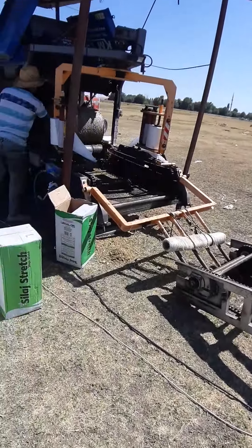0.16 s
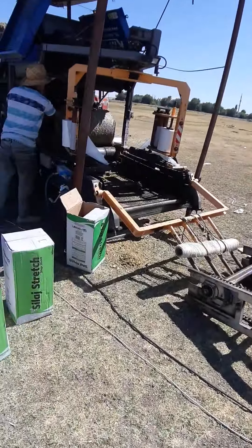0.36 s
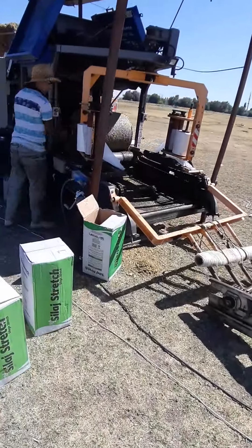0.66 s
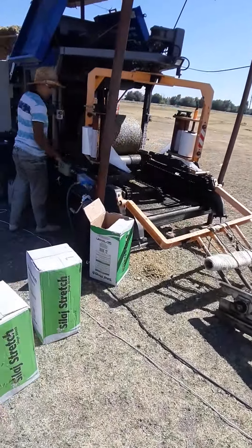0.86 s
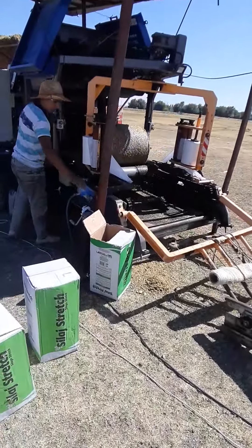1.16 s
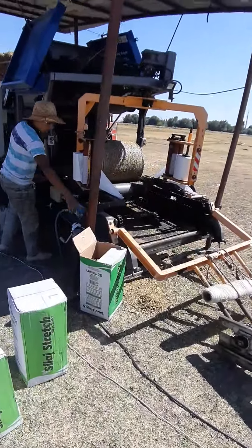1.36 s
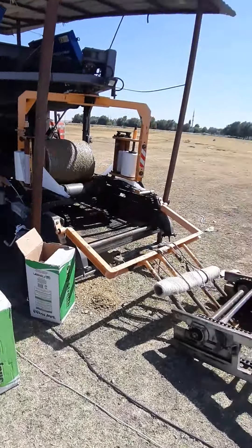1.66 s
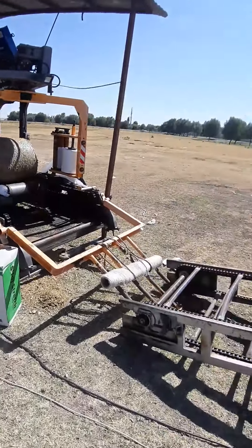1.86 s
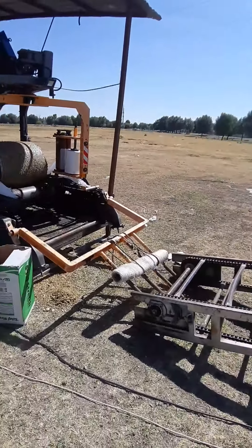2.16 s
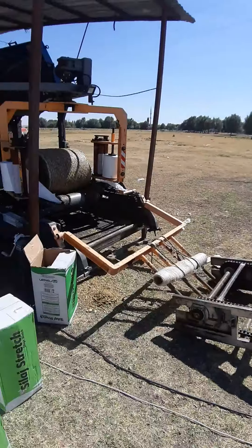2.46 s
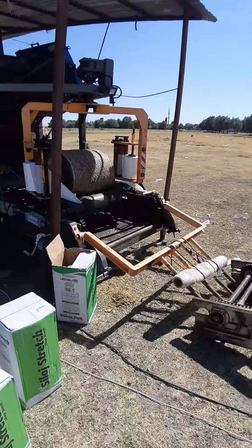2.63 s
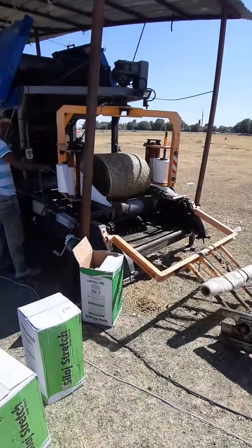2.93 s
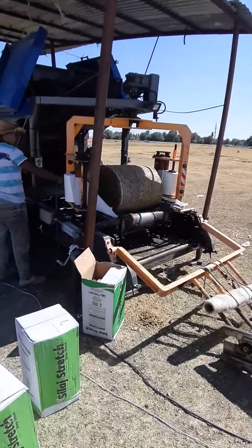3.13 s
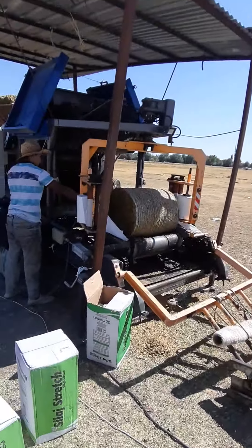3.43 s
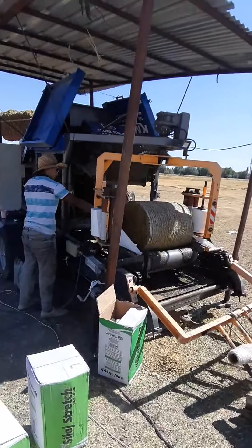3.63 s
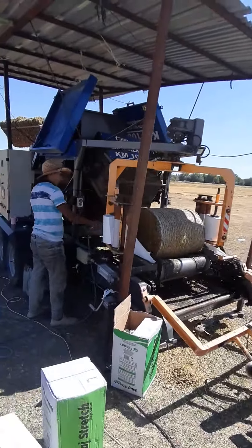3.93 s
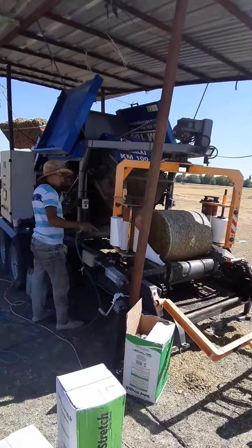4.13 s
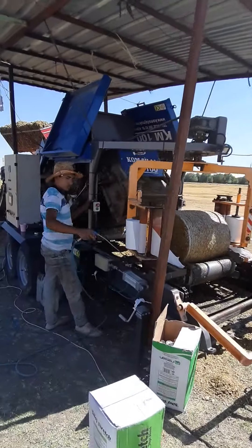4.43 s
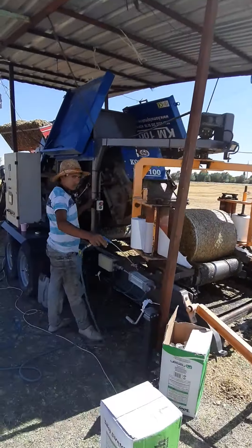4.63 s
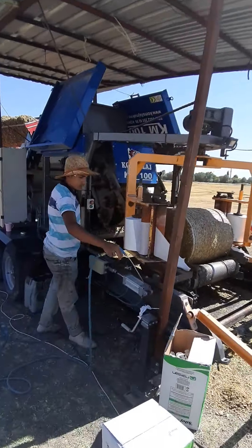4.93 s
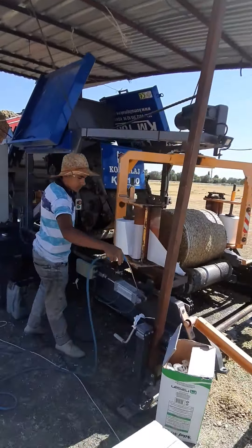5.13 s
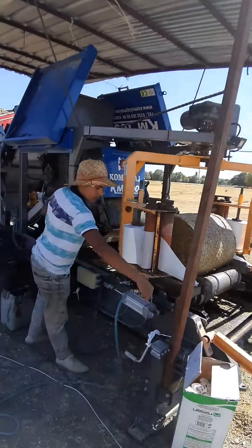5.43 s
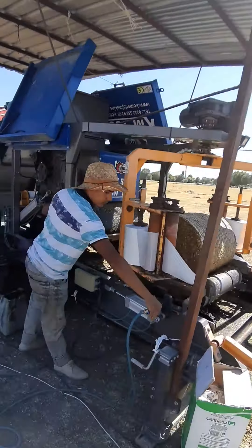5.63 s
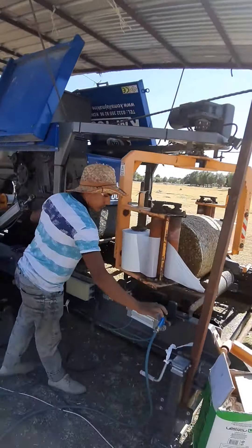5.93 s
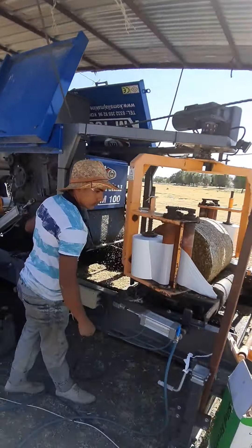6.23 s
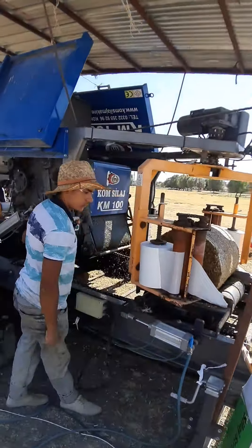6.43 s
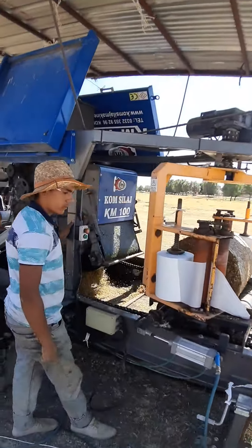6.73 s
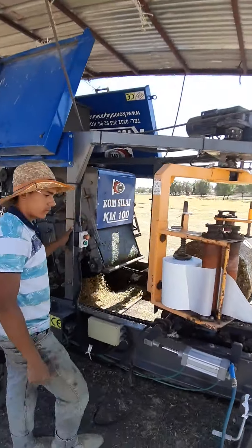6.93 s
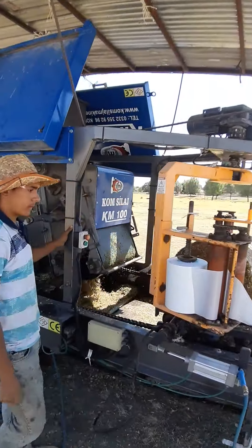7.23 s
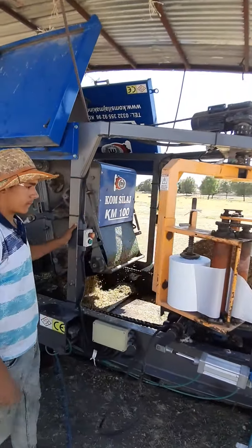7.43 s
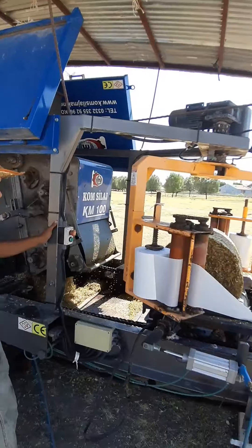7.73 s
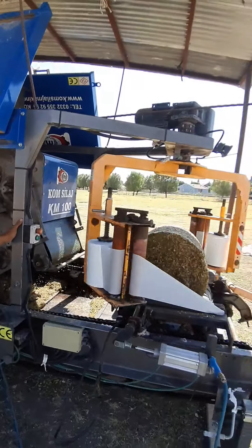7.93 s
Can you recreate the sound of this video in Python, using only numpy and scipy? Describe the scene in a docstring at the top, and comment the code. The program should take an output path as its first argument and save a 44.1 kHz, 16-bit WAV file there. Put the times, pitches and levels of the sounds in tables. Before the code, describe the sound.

Loud compressed air hisses for several seconds over the rapid chugging, chain rattle and squeaking of a running farm baler.

```python
"""Silage baler under a tin roof

A baler and wrapper runs at a field's edge, heard on a walk from its front round to its side.
Its piston compressor chugs 13.5 times a second over whining drives, rattling chains and a dry bearing.
An air line blows off in one short and one long blast; a light wind touches the microphone."""
import sys
import numpy as np
from scipy import signal
from scipy.fft import rfft, irfft, next_fast_len
from scipy.io import wavfile

SR = 44100
rng = np.random.default_rng(int(sys.argv[2]) if len(sys.argv) > 2 else 0)


def inscribe(sig):
    """Save sig as 16-bit PCM at rate SR to the path in sys.argv[1].

    A 1-D sig is mono; a 2-D sig holds one channel per row.
    Samples are clipped to [-1, 1] before scaling.
    """
    pcm = np.round(np.clip(np.atleast_2d(sig).T, -1, 1) * 32767)
    wavfile.write(sys.argv[1], SR, pcm.astype(np.int16))


N = 356328
TIME = np.arange(N) / SR
FFT_SIZE = next_fast_len(N)
FREQ = np.maximum(np.arange(FFT_SIZE // 2 + 1) * SR / FFT_SIZE, 1)

# the walk round the machine: time_s, aside (0 in front, 1 at the side)
WALK_ROUND = [(3, 0.005), (6, 0.72)]
# nearness of the machine, as loudness: time_s, gain_db
NEARNESS = [(2.3, 0), (6.2, -8.5), (7.0, -8), (7.75, 7), (8.05, 7.5)]

# pace of the crank: time_s, strokes_per_s
CRANK_SPEED = [(0, 13.51), (3.1, 13.51), (3.5, 13.535), (5.6, 13.53), (6.2, 13.49), (8.08, 13.48)]
# air pulses in the intake pipe, every stroke: offset_s, pitch_hz, length_s, front_db, side_db
INTAKE_PUFFS = [(-.0004, 470, 0.0025, 3.5, 6), (.0023, 503, .0127, -9, -10.5), (.0137, 364, .0063, -29, 6),
                (.0143, 426, 0.007, 3, -6.5), (.0509, 493, 0.011, -9, -19)]
# the reed's slap and flutter, every stroke: offset_s, pitch_hz, length_s, front_db, side_db
REED_FLUTTER = [(-.0001, 841, 0.00097, -1, 19.5), (.0145, 785, 0.0046, -4.5, 14),
                (.01826, 778, 0.005, -2, -17), (.0222, 840, 0.0073, 1, 8), (.0294, 960, .017, -11.5, 4),
                (.03293, 857, 0.023, -2.5, -12), (.05445, 890, .0177, -8.5, -10)]
# the chug along the walk: time_s, intake_db, reed_db
CHUG_LEVELS = [(0.1, -28, -28), (1.45, -26, -26.5), (1.9, -26.5, -31.5), (2.4, -25.5, -27.5),
               (2.7, -28.5, -36), (3.2, -30.5, -35.5), (3.55, -47, -46), (5.0, -51, -44),
               (6.2, -42.5, -49.5), (7.1, -41, -45), (7.6, -29.5, -34), (8.0, -29.5, -31)]
# the compressor's hum along the walk: time_s, level_db
HUM_LEVEL = [(.05, -35), (1.5, -33), (1.95, -37), (2.35, -35), (2.7, -41), (3.2, -40), (3.6, -59),
             (6.1, -62), (7.1, -69), (7.6, -41), (7.95, -34)]
# a sheet-metal panel ringing with the puffs: pitch_hz, t60_s, gain_db
PANEL_MODES = [(472, 0.079, -13), (531, 0.079, 10), (606, 0.15, 7), (679, 0.14, 10)]
# the frame shuddering with each stroke: pitch_hz, t60_s, gain_db
FRAME_MODES = [(684, 0.14, -1), (1015, 0.084, 5), (1167, 0.12, 5), (1219, 0.15, 4), (1298, 0.06, 3)]
# how much later the compressor arrives on the left: time_s, lag_s
COMPRESSOR_LAG = [(.8, -.00002), (2, .00005), (2.9, 0), (6.6, .00012), (7.7, .00018)]

# blasts of the air line: open_s, ease_s, close_s, easing_time_s, decay_s, rush_db, hiss_db
AIR_BLASTS = [(2.439, 2.837, 3.27, 0.13, 0.024, -21, -20), (3.259, 5.903, 6.147, 0.35, 0.023, -22.5, -20.5)]
# colour of the short blast: frequency_hz, density_db
SHORT_JET_COLOUR = [(350, -31), (600, 5), (727, -6), (856, -2), (1330, -14), (1500, -6), (2080, -10),
                    (2460, -2), (4420, -8), (6760, -3), (7860, -7), (12900, -3), (15800, -5)]
# colour of the long blast: frequency_hz, density_db
LONG_JET_COLOUR = [(1180, -37), (2000, -8), (2300, -7), (4830, -1.5), (5550, -3), (6210, -6), (7130, -2),
                   (8120, -8), (9010, -4.5), (12200, 2), (15100, 5.5), (15800, 1.5)]
# the jet sweeping over parts of the frame: start_s, length_s, roar_db, buffet_db
JET_STRIKES = [(2.412, 0.16, -22.5, -28), (2.605, .12, -34, -51), (2.776, 0.082, -34, -34),
               (2.9, 0.076, -32, -36), (3.269, 0.11, -28, -29.5), (3.306, 0.74, -30.5, -35.5),
               (3.586, 0.19, -26, -31), (3.774, 0.23, -27, -30.5), (3.987, 0.28, -29, -34),
               (4.163, 0.24, -26, -31.5), (4.36, 0.18, -24.5, -29), (4.496, 0.2, -22.5, -40),
               (4.644, 0.31, -29.5, -47.5), (4.834, 0.69, -30.5, -46), (5.566, 0.18, -30.5, -42)]
# colour of the jet's roar: frequency_hz, density_db
ROAR_COLOUR = [(650, -0.07), (1400, -2.0), (2900, -0.63)]
# colour of its low buffeting: frequency_hz, density_db
BUFFET_COLOUR = [(150, -21), (260, -6.5), (380, -1), (520, -0.5), (750, 0)]
# overtones of an open tube in the frame: pitch_hz, width_hz, gain_db
TUBE_MODES = [(1524, 17, -1.5), (1950, 40, -10), (2490, 60, -0.5), (2930, 35, -3), (3220, 42, -7),
              (3520, 39, -4), (4080, 71, -5)]
# the jet crossing the tube's mouth: start_s, length_s, level_db
TUBE_BLOWS = [(2.48, 0.089, -33), (2.595, 0.038, -25), (2.635, 0.11, -27), (2.772, 0.069, -23),
              (2.905, 0.045, -28)]
# whistles and squeals: start_s, length_s, start_hz, end_hz, width_hz, level_db
WHISTLE_GLIDES = [(0.113, 0.056, 5100, 4870, 50, -22), (1.205, 1.53, 2440, 2650, 158, -41.5),
                  (1.848, 0.96, 5480, 5710, 125, -41.5), (1.952, 0.072, 3300, 5100, 130, -37),
                  (2.163, 0.088, 5460, 4300, 130.4, -41), (2.242, 0.064, 5340, 4180, 130, -38),
                  (2.503, 0.47, 6800, 6580, 200, -31), (3.22, 0.66, 5620, 5550, 130, -30),
                  (4.65, 1.0, 4810, 4780, 110, -34), (5.03, .17, 4980, 4660, 120, -32),
                  (5.106, 1.06, 7010, 7130, 260, -31), (6.012, 0.13, 5820, 5160, 327, -25),
                  (6.104, 0.063, 4900, 4700, 303, -23)]
# short scrapes and spits: start_s, length_s, low_hz, high_hz, level_db
SPIT_BURSTS = [(1.611, 0.02, 5760, 7200, -33), (2.452, 0.082, 1460, 5280, -19.5),
               (2.598, 0.028, 1400, 4550, -18.5), (2.636, 0.055, 3000, 8100, -20),
               (2.77, 0.12, 2440, 7450, -23), (3.27, 0.26, 7200, 10860, -31), (5.5, 0.63, 7000, 9560, -39),
               (6.03, 0.14, 4440, 7000, -26), (6.115, 0.058, 7400, 10100, -29),
               (6.12, 0.55, 6900, 11200, -44.5), (6.63, 0.042, 2500, 7300, -37),
               (7.152, 0.025, 3620, 6900, -31.5), (7.153, 0.033, 920, 5180, -30.5),
               (7.81, 0.24, 10900, 13200, -34), (7.93, 0.05, 2640, 4560, -22)]
# the jet catching an edge: start_s, level_db
EDGE_SPLUTTERS = [(3.282, -26), (3.311, -22), (3.394, -25), (3.545, -28), (3.64, -29), (3.70, -26),
                  (3.722, -29), (3.83, -25), (3.932, -25.5), (4.18, -26), (4.235, -24), (4.44, -29),
                  (4.47, -27), (4.625, -26), (4.68, -30), (4.739, -25.5), (4.799, -23), (4.845, -26.5),
                  (5.05, -25)]

# colour of the chains' and rollers' clatter: frequency_hz, density_db
CLATTER_COLOUR = [(520, 4), (1070, 1.5), (1500, -0.5), (2070, -2), (2960, -3), (3400, -3.5), (4200, -5.5)]
# colour of the frame's drone: frequency_hz, density_db
DRONE_COLOUR = [(110, -2.5), (190, -0.5), (250, -4.5), (380, -3.5), (520, -1)]
# colour of the chains' hiss: frequency_hz, density_db
CHAIN_COLOUR = [(4200, -2.5), (5500, 2.5), (6400, 0.5), (7000, 5.5), (7700, -0.5)]
# colour of the sizzle on top: frequency_hz, density_db
SIZZLE_COLOUR = [(7500, 2), (9000, -3), (11000, 1), (13000, 2), (15800, 0.5)]
# fader for chain hiss and sizzle: time_s, level_db
TREBLE_LEVEL = [(0.1, -33), (0.55, -42), (2.35, -42), (6.3, -34), (6.8, -50.5), (7.1, -49), (7.9, -31),
                (8.05, -30.5)]
# resonances of the drive: pitch_hz, width_hz, gain_db
WHINE_MODES = [(2216, 19, 1), (2340, 103, 1.5), (2480, 70, -4)]
# the whine along the walk: time_s, level_db
WHINE_LEVEL = [(2.3, -40.5), (5.9, -47), (6.9, -43), (7.75, -29.5), (8.05, -29.5)]
# how much later the whine arrives on the left: time_s, lag_s
WHINE_LAG = [(1, -.0001), (2.9, -.00003), (6.7, -.00001), (7.7, .00006)]
# the bearing's two faint tones, every stroke: offset_s, pitch_hz, length_s, front_db, side_db
BEARING_CHIRPS = [(0.018, 3752, 0.04, -48.5, -41.5), (0.035, 5270, 0.085, -47, -58)]
# the bearing's loud squeaks: start_s, pitch_hz, level_db
BEARING_SQUEAKS = [(0, 3740, -41), (.055, 3756, -41.5), (.435, 3756, -41), (1.02, 3760, -37),
                   (1.315, 3756, -31.5), (1.385, 3756, -36), (1.462, 3756, -35), (1.49, 5230, -33),
                   (1.537, 3736, -29), (1.611, 3730, -29.5), (1.688, 3756, -29.5), (1.705, 5250, -36),
                   (1.758, 3756, -30), (1.782, 5250, -37), (1.832, 3756, -36), (1.902, 3756, -38),
                   (2.051, 3770, -39), (2.08, 5200, -37), (2.205, 3756, -30), (2.228, 5300, -36),
                   (6.415, 3756, -40), (7.16, 3756, -47), (7.373, 3820, -40), (7.452, 3790, -35),
                   (7.526, 3756, -39), (7.6, 3720, -32), (7.672, 3756, -32)]

# colour of the wind rumble: frequency_hz, density_db
WIND_COLOUR = [(20, -35), (45, -32), (80, -4.5), (110, -3), (200, -4), (330, -5)]
# gusts on the microphone: start_s, length_s, level_db
WIND_GUSTS = [(-.03, 0.092, -23.5), (.1, 0.11, -27.5), (.72, 0.11, -37), (1.0, 0.1, -28),
              (1.58, 0.091, -33), (1.68, 0.12, -34), (2.34, 0.24, -35.5), (2.5, 0.057, -35),
              (2.92, .07, -37), (4.3, 2.04, -46), (5.62, 0.26, -43), (7.4, 0.41, -50)]
# reflections off ground, roof and frame: left_delay_s, right_delay_s, gain_db
SHED_ECHOES = [(.0044, .0052, -15), (.0115, .0096, -16), (.0262, .0245, -36), (.0371, .0368, -15.5)]
# how alike the noise is left and right: frequency_hz, correlation
STEREO_LIKENESS = [(60, 0.045), (300, 0.22), (700, 0.28), (1400, 0.17), (6800, -0.12), (15000, 0.19)]


def compressor():
    """The valve pops into the intake pipe and its reed flutters over a hum; panel and frame ring along."""
    intake_gain, reed_gain = gains(CHUG_LEVELS)
    aside = curve(WALK_ROUND)
    # suction starts each puff; the small pipe mouth radiates little bass
    puffs = butterworth(-each_stroke(INTAKE_PUFFS, aside), 1, 290, "high")
    passing_s, span_s = 2.1, 0.39  # the panel is loudest as it is passed
    panel_gain = from_db(-21.5) + from_db(-5) * np.exp(-((TIME - passing_s) / span_s) ** 2)
    intake = intake_gain * (puffs + panel_gain * ringing_metal(puffs, PANEL_MODES))
    reed = reed_gain * each_stroke(REED_FLUTTER, aside)
    chugs = butterworth(intake + reed, 2, 55, "high")
    frame_gain = from_db(-47 + 2 * aside + curve(NEARNESS))
    frame = frame_gain * ringing_metal(strokes(offset_s=0.015), FRAME_MODES)
    hum_phase = 2 * np.pi * 65 * crank_turns() + 0.15 * drift(5)  # 65th harmonic of the crank
    hum = from_db(curve(HUM_LEVEL)) * np.sqrt(2) * np.sin(hum_phase)
    return left_later(shed(chugs) + frame + hum, curve(COMPRESSOR_LAG)) * from_db([[-1.7], [1.1]])


def crank_turns():
    """Turns of the crank since the start."""
    return np.cumsum(curve(CRANK_SPEED)) / SR


def strokes(offset_s, spread_db=0.9, jitter_s=0.00005, first_s=0.0402):
    """One click in each turn of the crank, no two quite alike."""
    turns = crank_turns()
    turn_s = np.interp(np.arange(int(turns[-1]) + 1), turns, TIME)
    click_s = np.append(-1 / CRANK_SPEED[0][1], turn_s) + first_s + offset_s  # already running
    at = np.round((click_s + jitter_s * rng.standard_normal(len(click_s))) * SR).astype(int)
    at = at[(at >= 0) & (at < N)]
    clicks = np.zeros(N)
    clicks[at] = from_db(spread_db * rng.standard_normal(len(at)))
    return clicks


def each_stroke(tones, aside):
    """The valve's short tones, repeated every turn and coloured by where the listener stands; rms 1."""
    out = 0
    for offset_s, hz, length_s, front_db, side_db in tones:
        gain = from_db(front_db + aside * (side_db - front_db))
        out += gain * tone_bursts(strokes(offset_s), hz, length_s)
    return rms_one(out)


def air_blasts(opening_s=0.017, eased_db=-8, sag_db_per_s=1.14):
    """The nozzle hisses as hose pressure sags; where the jet strikes the frame it roars and buffets."""
    out, flow = 0, 0
    facing_db = 3 * swell(2.85, 3.9)  # the nozzle swings towards the listener
    for blast, colour in zip(AIR_BLASTS, (SHORT_JET_COLOUR, LONG_JET_COLOUR)):
        open_s, ease_s, close_s, easing_time_s, decay_s, rush_db, hiss_db = blast
        opening = np.clip((TIME - open_s) / opening_s, 0, 1)
        eased = 1 - np.exp(-np.maximum(TIME - ease_s, 0) / easing_time_s)
        pressure = opening * from_db(eased_db * eased - sag_db_per_s * (TIME - open_s))
        closed_for_s = np.maximum(TIME - close_s, 0)
        jet = pressure * np.exp(-closed_for_s / decay_s)
        emptying = pressure * np.exp(-closed_for_s / (3 * decay_s))  # hiss lingers as the hose empties
        rush = from_db(rush_db) * noise(colour, 3300, 7980, flicker_db=1.43, flicker_hz=19)
        hiss = from_db(hiss_db + facing_db) * noise(colour, 9560, 18900, flicker_db=1.1, flicker_hz=15)
        out += jet * rush + emptying * hiss
        flow += jet
    roars = [(s, length_s, db) for s, length_s, db, _ in JET_STRIKES]
    buffets = [(s, length_s, db) for s, length_s, _, db in JET_STRIKES]
    roar = noise(ROAR_COLOUR, 650, 3440, flicker_db=1.1, flicker_hz=70)
    roar *= surges(roars, fade_s=0.037, floor=from_db(-37))  # the free jet still roars a little
    buffet = noise(BUFFET_COLOUR, 185, 685, flicker_db=1.95, flicker_hz=34)
    buffet *= surges(buffets, fade_s=0.012)
    return out + flow * (roar + buffet)


def blown_tube():
    """The short blast sounds the overtones of an open tube: a hollow squeal."""
    return surges(TUBE_BLOWS, fade_s=0.0063) * resonant_noise(TUBE_MODES)


def whistles():
    """Breathy, sliding tones; the wider ones are more hiss than note."""
    white, out = rng.standard_normal((2, 2, N)), np.zeros((2, N))
    for start_s, length_s, start_hz, end_hz, width_hz, db in WHISTLE_GLIDES:
        at = during(start_s, length_s)
        breath = rms_one(butterworth(white[..., at], 2, width_hz, "low"))
        pitch_hz = np.interp(TIME[at], [start_s, start_s + length_s], [start_hz, end_hz])
        phase = 2 * np.pi * np.cumsum(pitch_hz) / SR
        tone = breath[0] * np.cos(phase) + breath[1] * np.sin(phase)
        out[:, at] += from_db(db) * swell(start_s, length_s)[at] * tone
    return out


def spits(splutter_s=0.027, splutter_band_hz=(637, 2830)):
    """Brief bursts of noise: bright spits, and duller splutters where the jet catches an edge."""
    splutters = [(s, splutter_s, *splutter_band_hz, db) for s, db in EDGE_SPLUTTERS]
    white = rng.standard_normal((2, N)) + 0.33 * rng.standard_normal(N)  # wide, with a little centre
    out = np.zeros((2, N))
    for start_s, length_s, low_hz, high_hz, db in SPIT_BURSTS + splutters:
        at = during(start_s, length_s)
        burst = rms_one(butterworth(white[:, at], 2, [low_hz, high_hz], "band"))
        out[:, at] += from_db(db) * swell(start_s, length_s)[at] * burst
    return out


def running_gear():
    """The machine's bed: chains and rollers clatter and hiss while the frame drones."""
    near_db, treble_db = curve(NEARNESS), curve(TREBLE_LEVEL)
    clatter = from_db(-32.5) * noise(CLATTER_COLOUR, 648, 4570, flicker_db=1.3, flicker_hz=19)
    rattle = from_db(-42) * chain_rattle(knocks_per_s=350, spread_db=3)
    drone = from_db(-45 + 0.81 * near_db) * noise(DRONE_COLOUR, 107, 506, flicker_db=1.5, flicker_hz=23)
    hiss = from_db(treble_db + 2.5) * noise(CHAIN_COLOUR, 3330, 7080, flicker_db=1, flicker_hz=26)
    sizzle = from_db(treble_db) * noise(SIZZLE_COLOUR, 5600, 22000, flicker_db=1, flicker_hz=27)
    return from_db(near_db) * (clatter + rattle) + drone + hiss + sizzle


def chain_rattle(knocks_per_s, spread_db, parts=16):
    """Links knock at random on small steel parts, each with its own pitch."""
    out = np.zeros((2, N))
    count = int(knocks_per_s * N / SR / parts) + 1
    for hz in np.geomspace(1100, 7000, parts):
        clicks = np.zeros((2, N))
        force = from_db(spread_db * np.minimum(rng.exponential(1, count), 4))
        clicks[:, rng.integers(0, N, count)] = force * rng.standard_normal((2, count))
        out += ring(clicks, hz, t60_s=22 / hz)
    return rms_one(out)


def drive_whine():
    """The drive sings in a few narrow resonances from one spot, with a wash of reflections."""
    source = resonant_noise(WHINE_MODES)[0]
    direct = left_later([source, source], curve(WHINE_LAG))
    reflected = from_db(-8) * resonant_noise(WHINE_MODES)
    return from_db(curve(WHINE_LEVEL)) * rms_one(direct + reflected) * from_db([[-1.8], [1]])


def dry_bearing(waver_hz=23, rough_db=2.5):
    """A dry bearing chirps faintly with each stroke and now and then squeaks out, rough and wavering."""
    aside, out = curve(WALK_ROUND), np.zeros(N)
    for offset_s, hz, length_s, front_db, side_db in BEARING_CHIRPS:
        gain = from_db(front_db + aside * (side_db - front_db) + 0.28 * curve(NEARNESS))
        clicks = strokes(offset_s, spread_db=4, jitter_s=0.002)
        out += gain * rms_one(tone_bursts(clicks, hz, length_s))
    waver = 2 * np.pi * np.cumsum(waver_hz * drift(62)) / SR
    for start_s, hz, db in BEARING_SQUEAKS:
        length_s = 0.076 - 0.015 * np.interp(start_s, TIME, aside)  # shorter from the side
        at = during(start_s, length_s)
        progress = np.clip((TIME[at] - start_s) / length_s, 0, 1)
        envelope = np.sin(np.pi * progress ** 0.36)
        out[at] += from_db(db) * np.sqrt(2) * envelope * np.sin(2 * np.pi * hz * TIME[at] + waver[at])
    roughness = from_db(rough_db * np.array([drift(80), drift(80)]))
    return left_later(out * roughness, lag_s=0.00006 + 0.000058 * aside)


def wind(shelter_db=-11):
    """Lumpy rumble on the microphone: gusts over a breeze that drops under the roof."""
    breeze = from_db(-47.5 + 0.62 * curve(NEARNESS) + shelter_db * curve(WALK_ROUND))
    rumble = noise(WIND_COLOUR, 14.6, 364, flicker_db=2.4, flicker_hz=23)
    return surges(WIND_GUSTS, fade_s=0.012, floor=breeze) * rumble


def shed(x):
    """Ground, roof and frame throw back a few reflections, timed differently for each ear."""
    heard = np.array([x, x])
    for left_s, right_s, db in SHED_ECHOES:
        echo = np.array([np.interp(TIME - s, TIME, x, left=0) for s in (left_s, right_s)])
        heard += from_db(db) * echo
    return heard


def noise(spectrum, low_hz, high_hz, flicker_db, flicker_hz):
    """Turbulent stereo noise in three bands that flicker partly together; rms 1."""
    colour, alike = from_db(at_hz(spectrum)), at_hz(STEREO_LIKENESS)
    # reflections swing the left-right phase from one pitch to the next
    swing = 0.39 * np.minimum(FREQ / 1000, 1) * np.sin(2 * drift(4)[:len(FREQ)])
    edges_hz = np.geomspace(low_hz, high_hz, 4)
    shared_flicker, out = drift(flicker_hz), 0
    for low, high in zip(edges_hz, edges_hz[1:]):
        band = colour / np.sqrt((1 + (low / FREQ) ** 20) * (1 + (FREQ / high) ** 20))
        mid, side = rfft(rng.standard_normal((2, FFT_SIZE))) * band
        side = np.sqrt(1 - swing ** 2) * side + 1j * swing * mid
        pair = irfft(np.sqrt(1 + alike) * mid + np.sqrt(1 - alike) * side * [[1], [-1]], FFT_SIZE)
        out += pair[:, :N] * from_db(flicker_db * (shared_flicker + drift(flicker_hz)))
    return rms_one(out)


def resonant_noise(modes):
    """Stereo noise singing through narrow resonances; rms 1."""
    out = 0
    for hz, width_hz, db in modes:
        t60_s = np.log(1000) / (np.pi * width_hz)
        out += from_db(db) * rms_one(ring(rng.standard_normal((2, N)), hz, t60_s))
    return rms_one(out)


def ringing_metal(drive, modes):
    """A shaken metal part rings in all its modes; rms 1."""
    return rms_one(sum(from_db(db) * ring(drive, hz, t60_s) for hz, t60_s, db in modes))


def ring(clicks, hz, t60_s):
    """A unit click sets a sine of height 1 ringing."""
    r, w = np.exp(-np.log(1000) / (t60_s * SR)), 2 * np.pi * hz / SR
    return signal.lfilter([0, np.sin(w)], [1, -2 * r * np.cos(w), r * r], clicks + 1e-18)


def tone_bursts(clicks, hz, length_s):
    """Each click starts a short tone that swells quickly and fades more slowly."""
    t = TIME[:int(length_s * SR)]
    envelope = np.sqrt(np.abs(np.sin(np.pi * (t / length_s) ** 0.82)))
    return signal.oaconvolve(clicks, np.sin(2 * np.pi * hz * t) * envelope)[:N]


def surges(events, fade_s, floor=0):
    """A gain made of swells with fading tails, added in power over a floor."""
    power = sum(from_db(db) ** 2 * swell(start_s, length_s) for start_s, length_s, db in events)
    r = np.exp(-1 / (fade_s * SR))
    return np.sqrt(floor ** 2 + signal.lfilter([1 - r], [1, -r], power))


def swell(start_s, length_s):
    """A rounded rise and fall."""
    return np.sin(np.pi * np.clip((TIME - start_s) / length_s, 0, 1))


def drift(rate_hz, hop=40):
    """A smooth random wander with spread 1."""
    r = np.exp(-2 * np.pi * rate_hz * hop / SR)
    slow = signal.lfilter([1], [1, -2 * r, r * r], rng.standard_normal(N // hop + 2002))[2000:]
    return np.interp(np.arange(N) / hop, np.arange(len(slow)), rms_one(slow))


def left_later(pair, lag_s):
    """Sound from the right reaches the left channel a little late."""
    return np.array([np.interp(TIME - lag_s, TIME, pair[0]), pair[1]])


def during(start_s, length_s):
    """The samples that an event covers."""
    return slice(*np.searchsorted(TIME, [start_s, start_s + length_s]))


def curve(points):
    """An automation line through timed points."""
    return np.interp(TIME, *np.transpose(points))


def gains(points):
    """Fader moves in dB as gains per sample."""
    time_s, *faders = np.transpose(points)
    return [from_db(np.interp(TIME, time_s, db)) for db in faders]


def at_hz(points):
    """A few spectrum points spread over all frequencies."""
    hz, value = np.transpose(points)
    return np.interp(np.log(FREQ), np.log(hz), value)


def butterworth(x, order, hz, kind):
    return signal.sosfilt(signal.butter(order, hz, kind, fs=SR, output="sos"), x)


def from_db(db):
    return 10 ** (np.asarray(db) / 20)


def rms_one(x):
    return x / np.sqrt(np.mean(x ** 2) + 1e-20)


def scene():
    """The mix: compressor, machinery and air line lean a little right, with wind underneath."""
    chugging = compressor()
    machinery = running_gear() + drive_whine() + dry_bearing()
    air_line = air_blasts() + blown_tube() + whistles() + spits()
    return chugging + (machinery + air_line) * from_db([[-0.4], [0.4]]) + wind()


def record(dry):
    """The top end is cut steeply."""
    cutoff_hz, slope_width_hz = 15850, 150
    passband = np.clip((cutoff_hz - FREQ) / slope_width_hz + 0.5, 0, 1)
    return irfft(rfft(dry, FFT_SIZE) * passband, FFT_SIZE)[:, :N]


dry = scene()
out = record(dry)
inscribe(out)
```